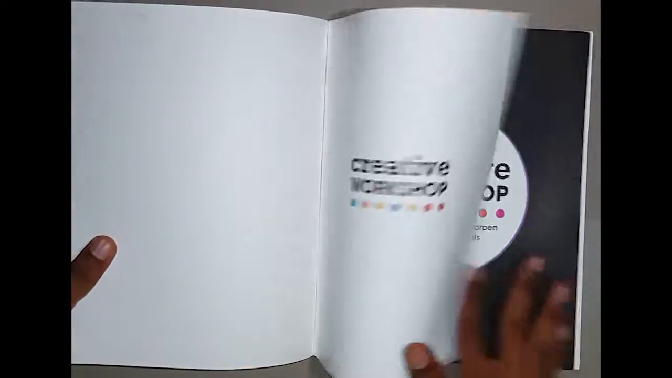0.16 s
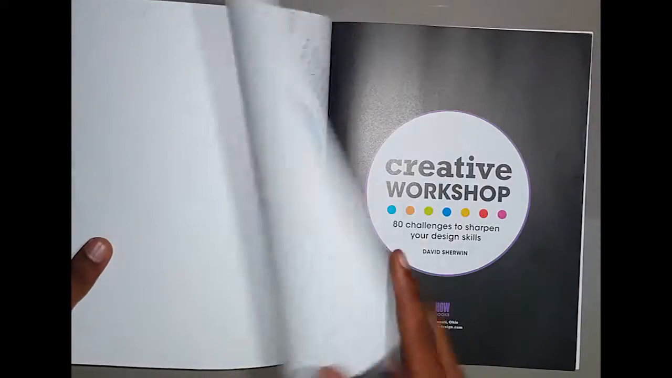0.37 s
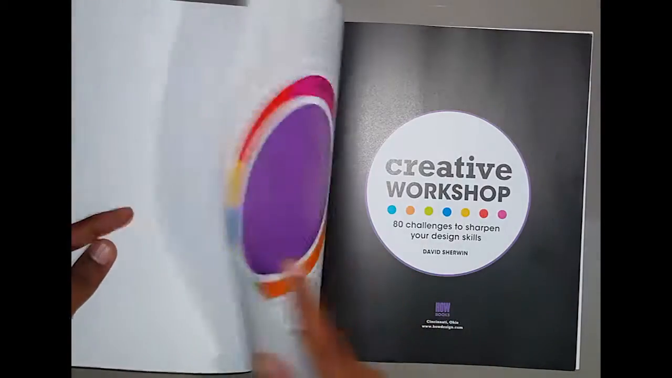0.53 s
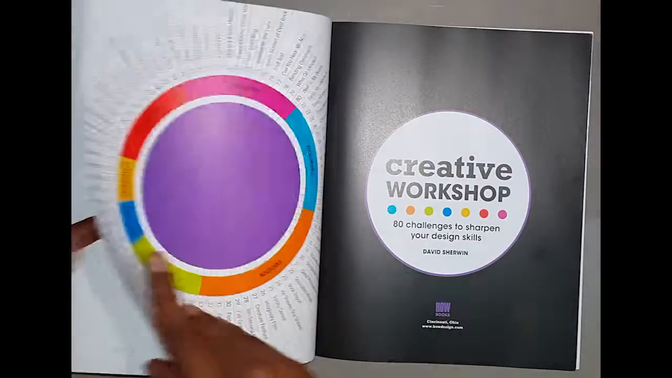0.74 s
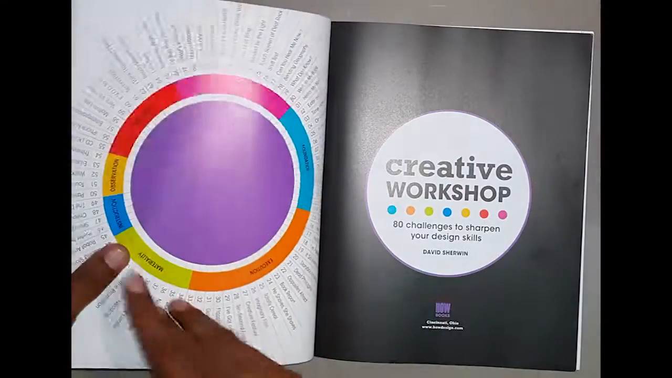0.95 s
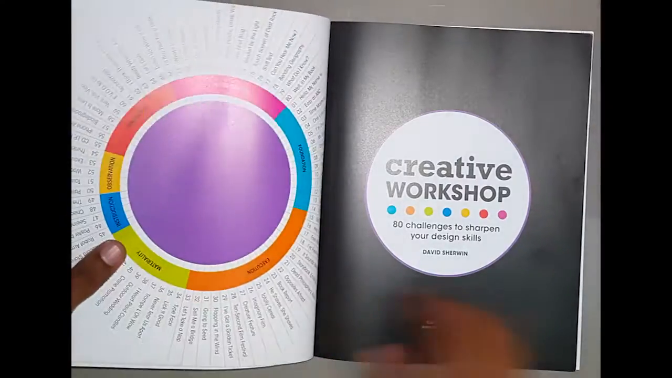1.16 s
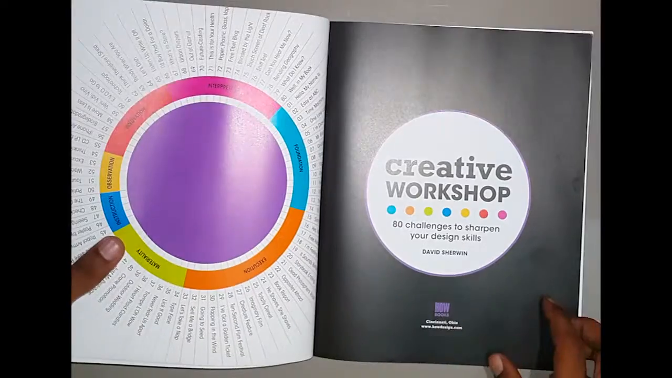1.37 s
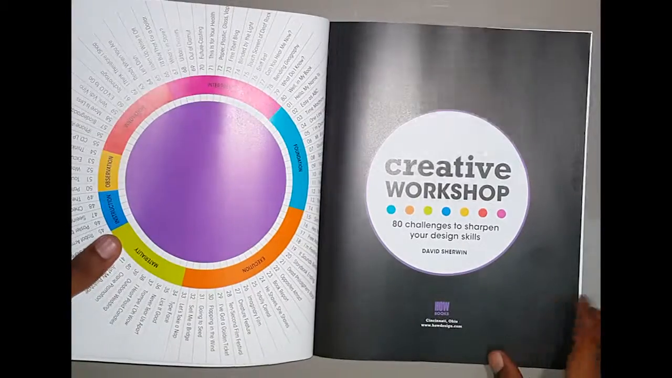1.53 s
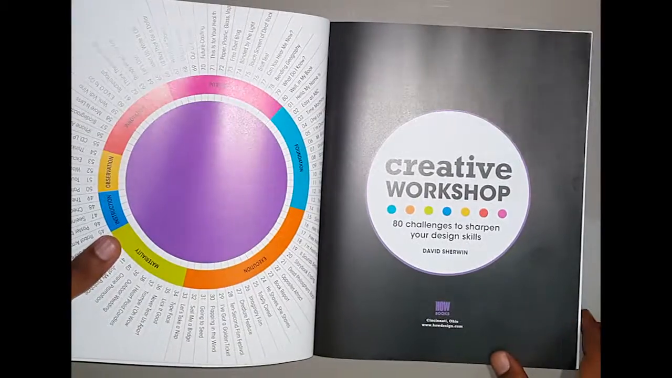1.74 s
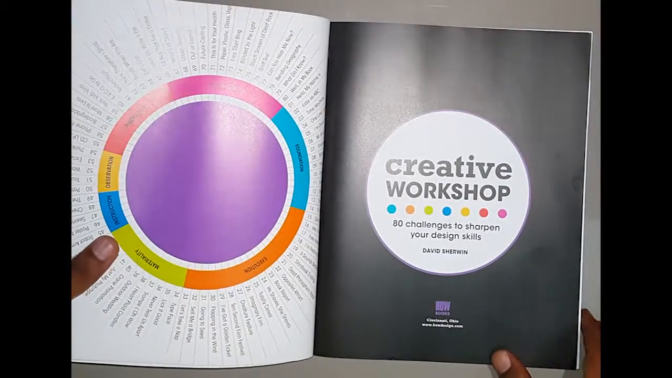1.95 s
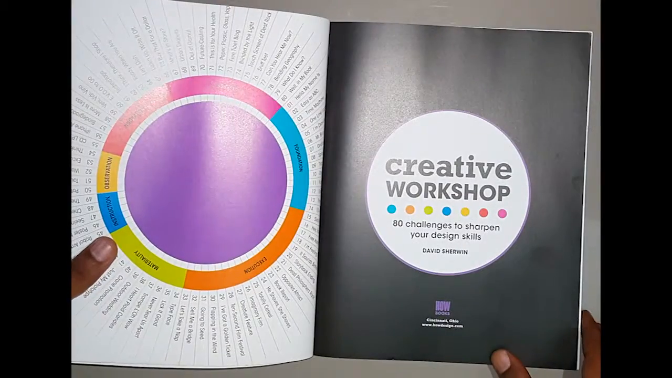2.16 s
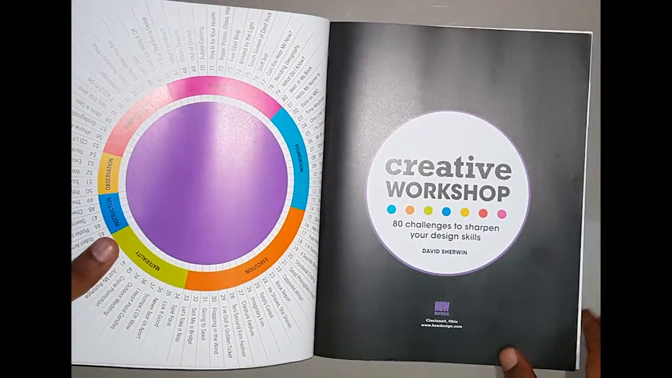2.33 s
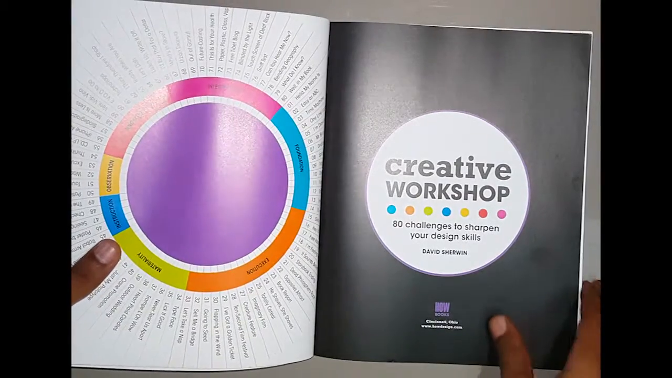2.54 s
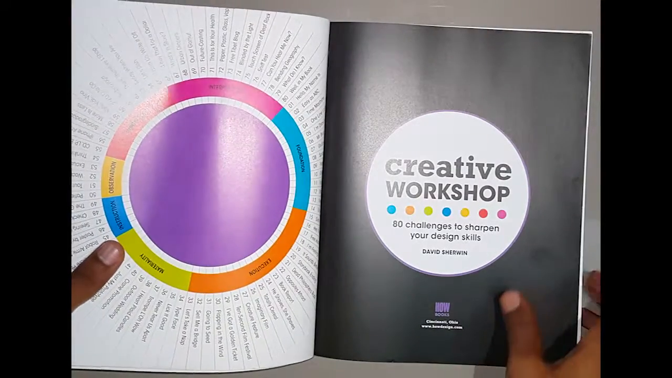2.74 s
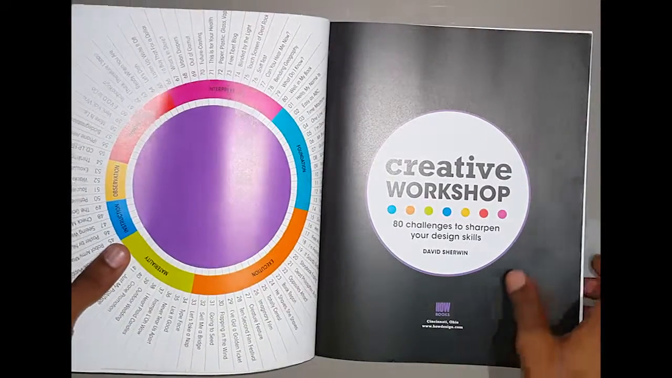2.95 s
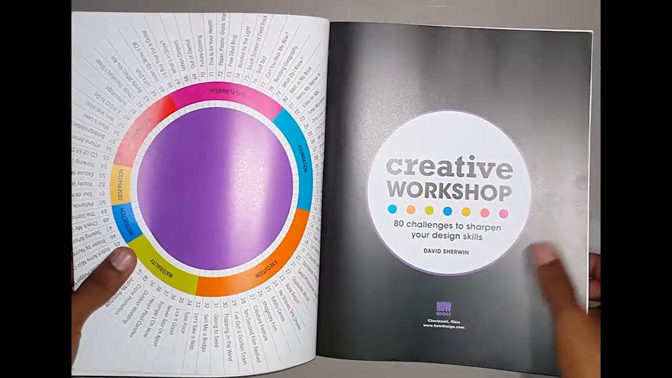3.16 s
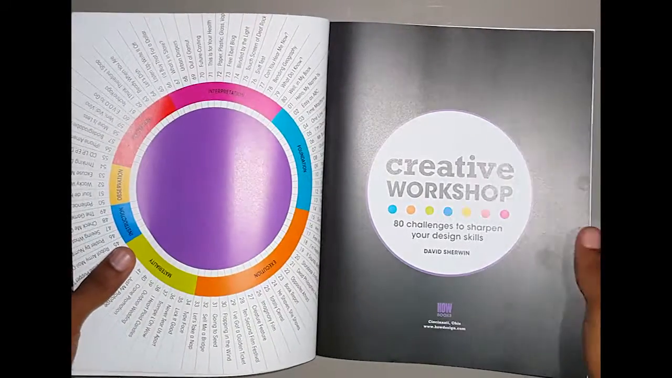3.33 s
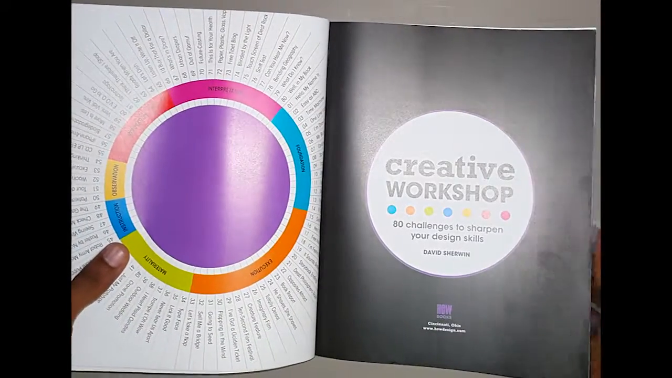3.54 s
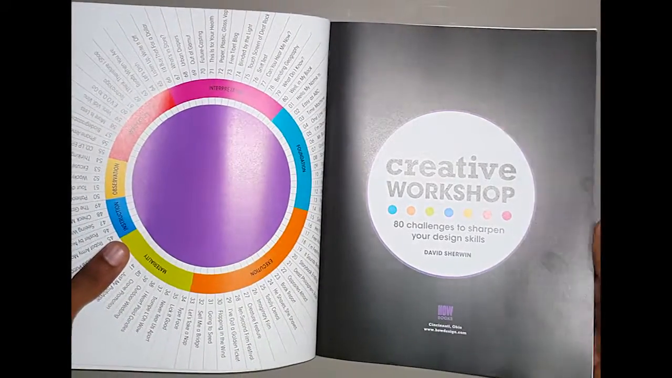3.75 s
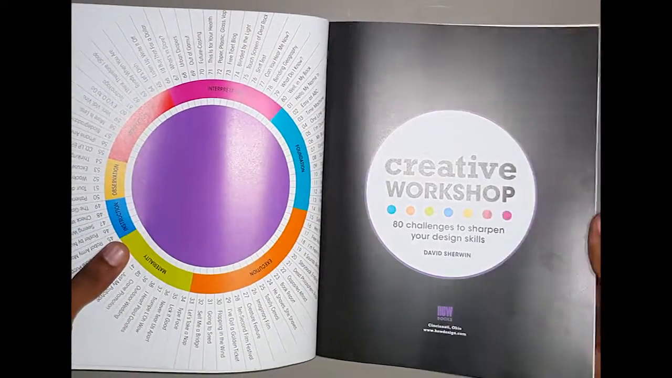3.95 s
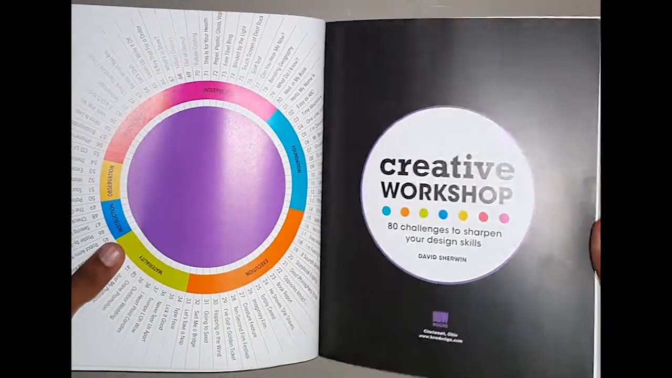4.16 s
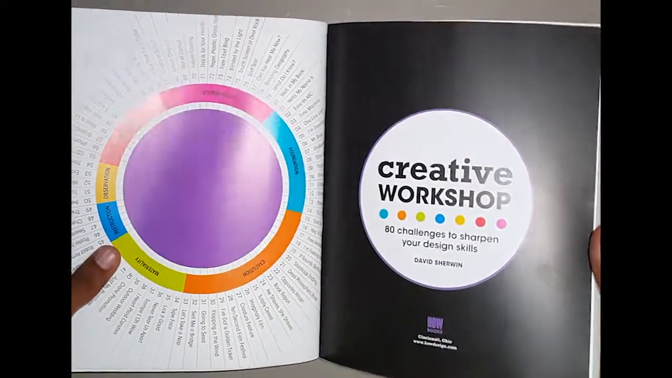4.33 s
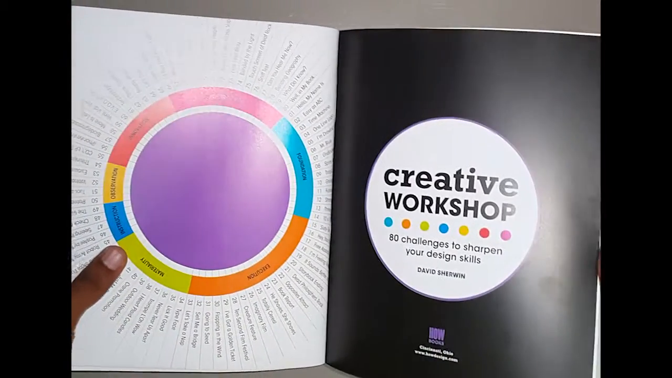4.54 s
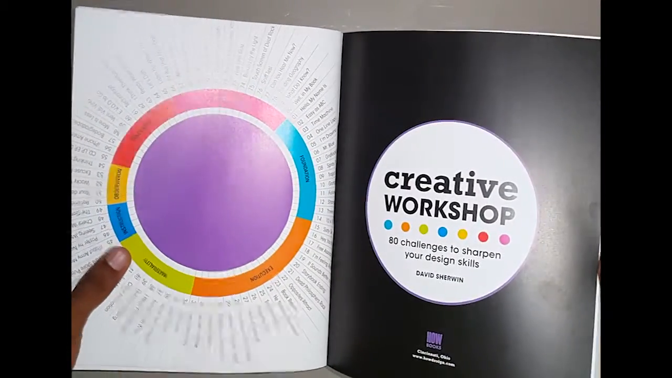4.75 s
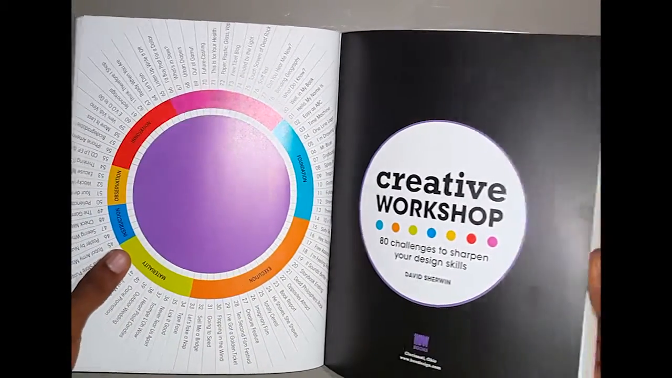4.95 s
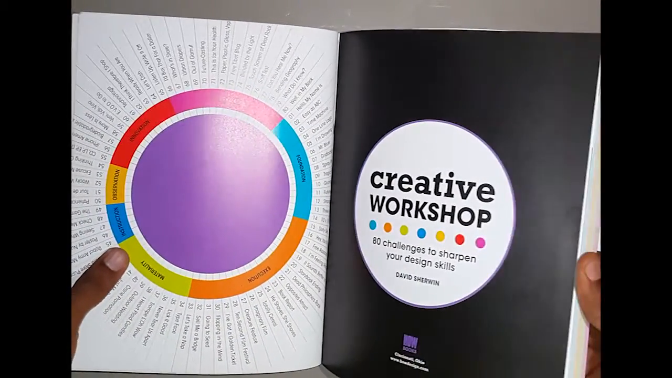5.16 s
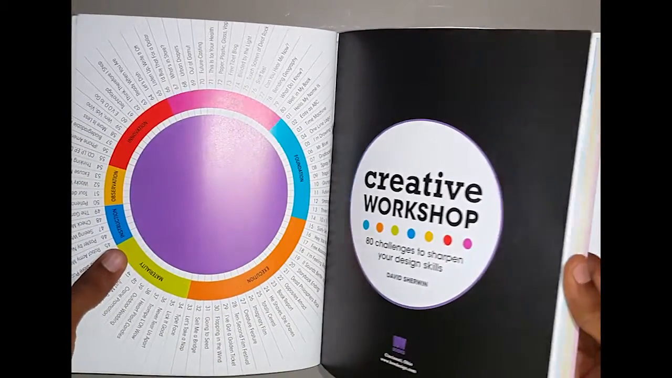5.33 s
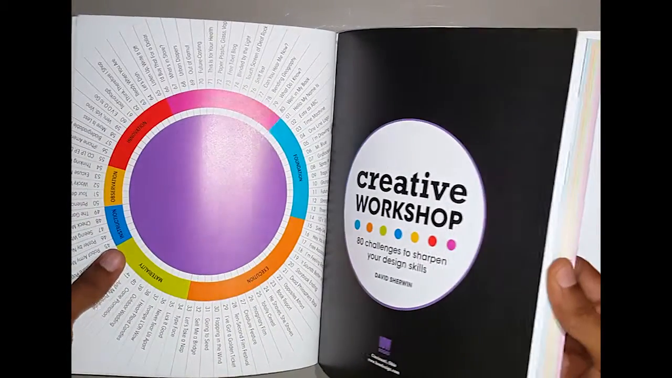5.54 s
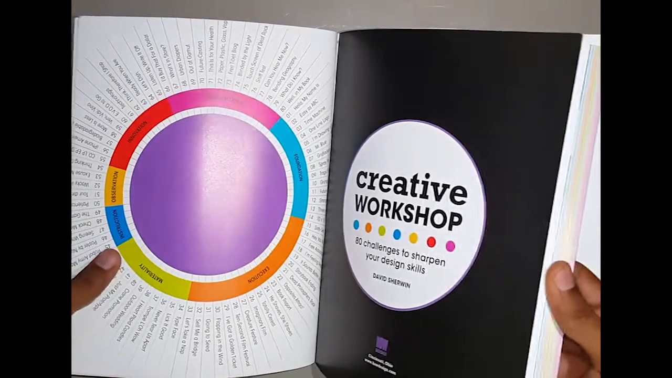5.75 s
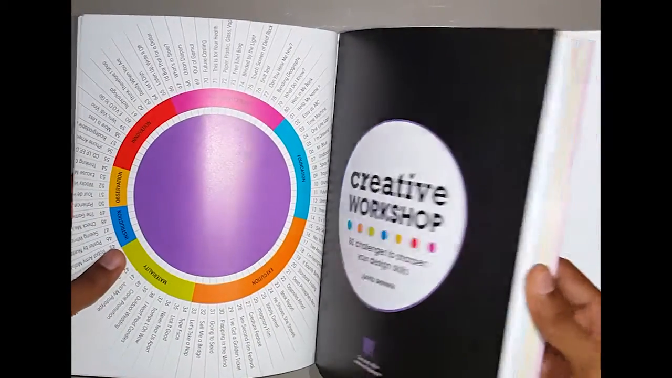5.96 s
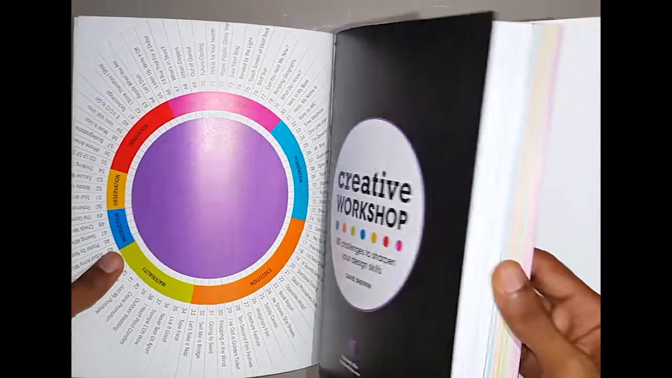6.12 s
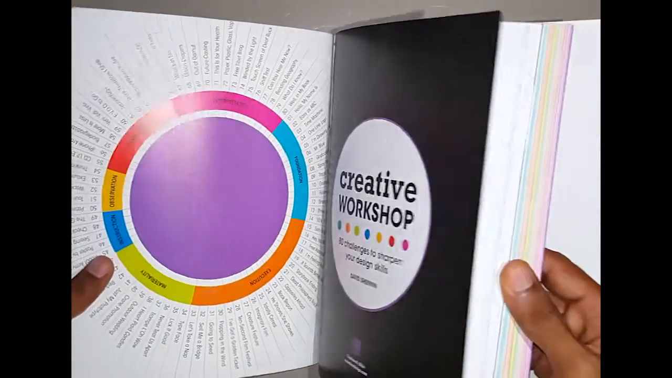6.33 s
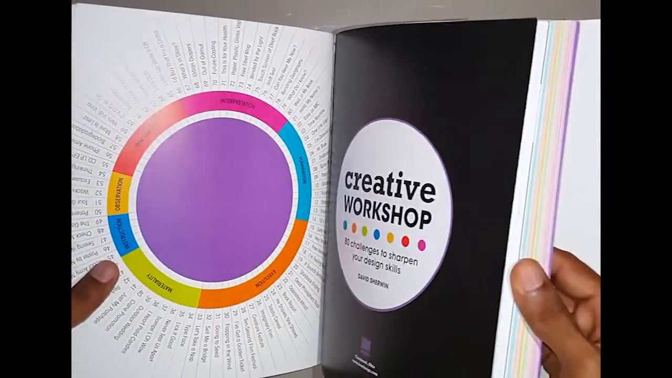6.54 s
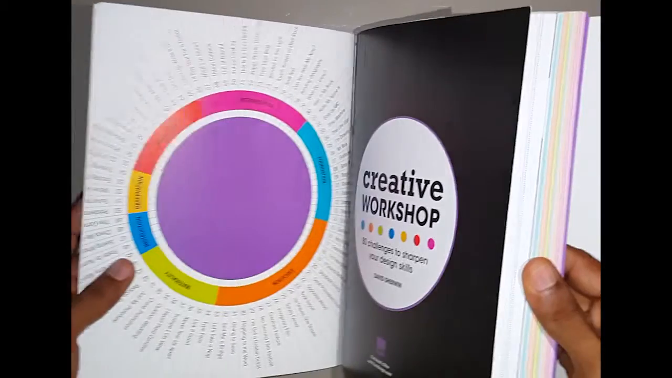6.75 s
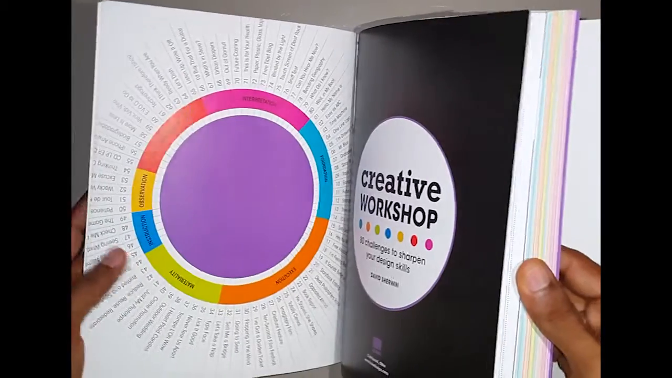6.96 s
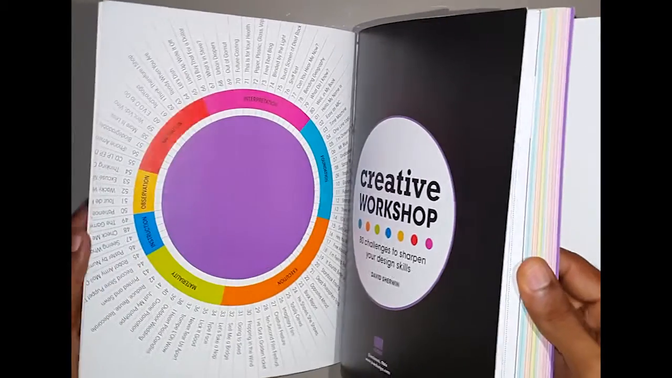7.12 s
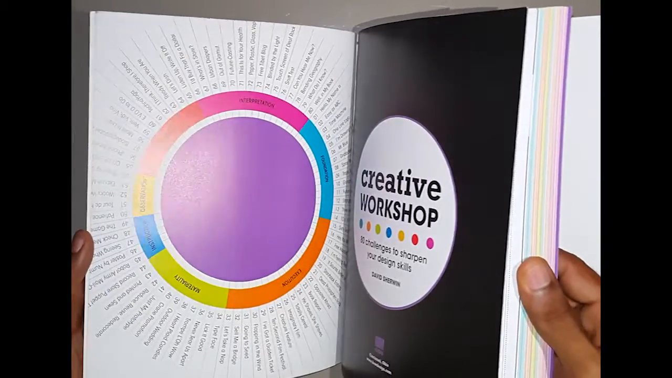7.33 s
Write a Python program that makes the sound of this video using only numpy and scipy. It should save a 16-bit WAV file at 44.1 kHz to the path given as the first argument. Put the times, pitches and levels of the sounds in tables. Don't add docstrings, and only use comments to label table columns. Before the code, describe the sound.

A quiet, small, dry room, heard close in stereo with soft hiss and barely perceptible electronic whine. From 0 to 0.8 seconds a large paper page turns: bright sliding rustle swells around 0.2 and again at 0.6, with whipping edges, dense sharp crease pops, a papery slap and hollow finger knocks on the table. Another crisp snap lands near 1.1, then lighter smoothing strokes and small ticks at about 1.45 and 1.65. It calms until a faint tick at 2.45. Near 2.95 the spine bumps with a low thud; muffled pats and slips follow. Deeper knocks come around 4.05 to 4.35, then page crackle and rubbing near 4.9 to 5.1. Small slaps patter at 5.7 to 5.85 and 6.3 to 6.6, a snap at 6.8, then the heaviest boomy table thud at 7.0 and a last papery tick at 7.13.

```python
import sys
import numpy as np
from scipy import signal
from scipy.fft import rfft, irfft, next_fast_len
from scipy.io import wavfile

SR = 44100
rng = np.random.default_rng(int(sys.argv[2]) if len(sys.argv) > 2 else 0)


def store_pcm(level_fs):
    pcm = np.round(np.clip(level_fs, -1, 1) * 32767).astype(np.int16)
    wavfile.write(sys.argv[1], SR, np.atleast_2d(pcm).T)


def boost_factor(decibels):
    exponent = np.asarray(decibels, float) / 20
    return 10 ** exponent


N = 325899
LIFT_S = 2.9


def seconds():
    return np.arange(N) / SR


def rms_one(x):
    return x / np.sqrt(np.mean(x ** 2) + 1e-20)


def sides(left_db, right_db=0):
    return boost_factor(np.array([[left_db], [right_db]]))


def at_hz(points, hz):
    table_hz, db = np.transpose(points)
    return np.interp(np.log(hz + 1), np.log(table_hz + 1), db)


def coloured(x, gain_db):
    size = next_fast_len(N)
    gain = boost_factor(gain_db(np.fft.rfftfreq(size, 1 / SR)))
    return irfft(rfft(x, size) * gain, size)[..., :N]


def filtered(x, order, hz, kind="low"):
    return signal.sosfilt(signal.butter(order, hz, kind, fs=SR, output="sos"), x)


def drift(rate_hz):
    r = np.exp(-2 * np.pi * rate_hz / SR)
    walk = signal.lfilter([1], [1, -2 * r, r * r], rng.standard_normal(N + SR))
    return rms_one(walk[SR:])


def resonance(x, hz, width):
    r = np.exp(-np.pi * width / SR)
    peak = np.array([1, 0, -1]) * (1 - r * r) / 2
    return signal.lfilter(peak, [1, -2 * r * np.cos(2 * np.pi * hz / SR), r * r], x)


def narrow_tone(x, hz, width):
    return rms_one(resonance(resonance(x, hz, width), hz, width))


def struck_mode(force, hz, t60):
    r, w = boost_factor(-60 / (t60 * SR)), 2 * np.pi * hz / SR
    return signal.lfilter([0, np.sin(w)], [1, -2 * r * np.cos(w), r * r], force + 1e-18)


def blows_at(times, levels_db):
    blows = np.zeros(N)
    blows[np.round(times * SR).astype(int)] = boost_factor(levels_db)
    return blows


def softened(blows, contact_s):
    push = np.hanning(round(contact_s * SR))
    return signal.oaconvolve(blows, push / push.sum())[:N]


def paper_bands(grains_per_s, spread_db):
    # (frequency [Hz], level per Hz [dB])
    spectrum = [(300, -7), (500, -6), (1000, 5.5), (2200, 3.5), (4000, -1), (8000, -12), (11000, -11.5),
                (16000, -16)]
    # (from [Hz], to [Hz])
    bands_hz = [(1500, 4000), (450, 1500), (4000, 8000), (8000, 17000)]
    own_share = [1, 0.95, 0.98, 1]
    far_levels = [-1.56, -3, 2, -5.5]
    lag_s = 0.001217
    born = rng.random((2, N)) < grains_per_s * boost_factor(3 * drift(60)) / SR
    size_db = spread_db * np.minimum(rng.exponential(1, (2, N)), 4)
    grains = born * boost_factor(size_db) * rng.choice([-1, 1], (2, N))
    raw = rms_one(grains) + 0.73 * rng.standard_normal((2, N))
    raw = coloured(raw, lambda hz: at_hz(spectrum, hz))
    out = []
    for band, own, far_db, sign in zip(bands_hz, own_share, far_levels, (1, -1, -1, 1)):
        near, other = rms_one(filtered(raw, 2, band, "band"))
        late = np.roll(near, round(lag_s * SR))
        far = np.sqrt(own) * other - np.sqrt(1 - own) * late
        out.append(sign * np.array([near, boost_factor(far_db) * far]))
    return out


def sliding(drag_db):
    # (loudest at [s], level [dB], length [s], body rel. [dB], sheen rel. [dB])
    strokes = [(0.005, -67.5, 0.093, 4.5, -5), (0.121, -46.5, 0.091, -16, 1.5),
               (0.084, -62, 0.057, -13, -7), (0.227, -43.5, 0.37, -24, 2.1), (0.603, -40.5, 0.23, 1, -49),
               (0.684, -54, 0.25, 1.5, -12), (0.904, -60.5, 0.6, -7, -4), (0.982, -53, 0.16, -1.5, 0),
               (1.118, -50.5, 0.25, -3.5, -16), (1.457, -54, 0.097, -25, 2.5),
               (1.646, -54.5, 0.2, -18, -3.5), (1.697, -62, 0.059, -6, 1), (1.895, -59.5, 0.26, -38, -11),
               (1.816, -63.5, 0.029, -12, -7), (2.101, -63.5, 0.095, -18, 0.5), (2.483, -62, 0.16, -20, -5),
               (2.898, -57.5, 0.1, -8, -7), (0.169, -50.5, 0.3, -0.5, -2), (0.545, -54, 0.085, 0, -3),
               (0.774, -59.5, 0.048, -11, -13)]
    # (loudest at [s], level [dB], length [s], body [dB], sheen [dB])
    rubs = [(4.084, -70, 0.89, -20, -11), (4.315, -56.5, 0.25, -13, -10), (4.564, -66.5, 0.7, -1.5, -5.5),
            (4.683, -69, 0.35, 1.5, -8), (4.931, -51.5, 0.13, -2, -1.5), (5.04, -53.5, 0.1, -5.5, -3),
            (5.007, -61.5, 0.27, -1.5, -2), (5.099, -56, 0.075, 1.5, -9), (5.37, -65.5, 0.21, -8, -4),
            (5.499, -67, 0.16, -12, -8), (6.118, -73.5, 0.38, 3.5, -9), (6.258, -83, 0.13, -2, 9),
            (6.54, -61, 0.25, -6, -11), (6.705, -58.5, 0.23, -13, -6), (6.808, -65.5, 0.37, 7, -8),
            (7.061, -66.5, 0.11, 0.5, 3)]
    # (loudest at [s], level [dB], length [s])
    whips = [
        (0.292, -47, 0.21),
        (0.341, -47.5, 0.13),
        (0.568, -52.5, 0.03),
        (0.591, -57, .025),
        (0.692, -61, 0.067),
        (1.0, -60, 0.032),
        (1.089, -52.5, 0.039),
        (4.915, -60, 0.067),
        (6.85, -68.5, 0.16),
        (6.53, -70, 0.054),
    ]
    rise_share, range_db = 0.37, 31.5
    roundness = 1.476
    t = seconds()
    creep_db = -73.5 + 0.78 * (drag_db - drag_db.mean()) - 3 * (t < LIFT_S)
    power = boost_factor(2 * np.add.outer([0, -3.5, -5.5, -3], creep_db))
    moves = [(*row, -10.5 + 0.45 * row[-1]) for row in strokes + rubs]
    moves += [(*row, -3.5, -2, 4) for row in whips]
    for s, db, length, *colour_db in moves:
        away = np.maximum((s - t) / rise_share, (t - s) / (1 - rise_share)) / length
        near = away < 2
        swell_db = db - range_db * away[near] ** roundness
        power[:, near] += boost_factor(2 * np.add.outer([0, *colour_db], swell_db))
    crisp_db, *others = 10 * np.log10(power)
    return crisp_db, *(db - crisp_db for db in others)


def rustle(crisp_db, *rel_db):
    crisp, *others = paper_bands(grains_per_s=2500, spread_db=1)
    flutter = boost_factor(crisp_db - 3.5 + 1.6 * drift(70))
    return flutter * (crisp + sum(boost_factor(db) * band for db, band in zip(rel_db, others)))


def snaps():
    # (time [s], peak [dB], body rel. [dB], sheen rel. [dB], t60 [s])
    creases = [(0.107, -35, -3.5, -12, 0.044), (0.2737, -37.5, 8, -19, 0.047),
               (0.529, -39.5, -28, -25, 0.06), (0.557, -31.5, -17, -11, 0.087), (0.567, -36, -10, 0, 0.066),
               (0.591, -20.5, -17, -13, 0.045), (0.603, -29, -8, -27, 0.05), (0.627, -20.5, -5, -32, 0.049),
               (0.634, -40, -8, -27, 0.051), (0.699, -33.5, -1, -5.5, 0.033), (0.966, -48, -32, -29, 0.2),
               (1.0852, -25, -15, -15, 0.06), (1.104, -46.5, 12, -27, 0.058), (1.131, -42, -3, -25, 0.056),
               (1.0889, -18, -5, -35.5, 0.052), (1.4401, -35, -22, -18, 0.043),
               (1.4643, -38.5, -32, -22, 0.12), (1.538, -51.5, -8, -8, 0.089),
               (1.643, -24.5, -23, -6.5, 0.023), (1.695, -53, -22, 4, 0.051),
               (2.443, -37.5, -15, -10, 0.083), (4.111, -49, -2, -5, 0.05), (4.4942, -55, 5, 4, 0.41),
               (4.8628, -49, -10, -4, 0.065), (4.9043, -29, -14, -4, 0.11), (4.943, -38.5, -15, -12, 0.06),
               (5.2545, -48.5, -0.5, -10, 0.038), (6.476, -52.5, 1, -4, 0.048),
               (6.516, -49, -11, -3, 0.071), (6.521, -42, -3, -7, 0.18), (7.1063, -43, -12, -22, 0.043)]
    # (time [s], peak [dB], body rel. [dB], sheen rel. [dB])
    pats = [(0.277, -31.5, 13.5, -2), (0.4, -52.5, 21.5, -17), (0.776, -39.5, 4, -2), (0.832, -45, 5, -5),
            (1.0346, -54, 17.5, -12), (1.294, -51.5, 2, 3), (1.3452, -51.5, 2, 4.5), (2.1, -66, 8.5, 4),
            (2.88, -39.5, -12, -6), (2.96, -53.5, 11, 3), (3.142, -53.5, 2.5, -18), (3.307, -53.5, 5.5, 9),
            (3.463, -53.5, 3, -17), (3.81, -68.5, 19.5, -17), (4.044, -57.5, 10.5, -17),
            (4.143, -46.5, 7.5, -15), (4.3173, -44.5, 7.5, -24), (5.102, -40, -6, -15),
            (5.733, -59.5, 14, 8), (5.786, -58, 9, 10), (5.838, -62, 15, 12.5), (6.327, -59, 10, 11),
            (6.377, -49, 8.5, 5.5), (6.42, -49.5, 7, 3), (6.566, -54, 4, -9), (6.82, -34, -6, -11.5),
            (6.991, -54, 13, 3), (7.129, -39, -5, -2), (7.258, -42, -2.5, -32)]
    pat_t60_s, pat_rise_s, crease_rise_s = 0.051, 0.0037, 0.0016
    bands = paper_bands(grains_per_s=2900, spread_db=0)
    out = np.zeros((2, N))
    events = [(*row, crease_rise_s) for row in creases]
    events += [(*row, pat_t60_s, pat_rise_s) for row in pats]
    for s, peak_db, body_db, sheen_db, t60, rise in events:
        i = round(s * SR)
        t = np.arange(min(SR // 4, N - i)) / SR
        t60 = min(t60, 0.3)
        # relative level [dB], part of the decay time
        shares = [(0, 0.8), (body_db, 1.1), (sheen_db, 0.6), (sheen_db - 34, 0.45)]
        burst = sum(band[:, i:i + len(t)] * boost_factor(db - 60 * t / (t60 * part))
                    for band, (db, part) in zip(bands, shares))
        out[:, i:i + len(t)] += boost_factor(peak_db - 9) * burst * np.minimum(t / rise, 1)
    return out


def room(x):
    t60_s, level_db, wall_cut_hz = 0.074, -7, 2370
    t = np.arange(SR // 3) / SR
    tail = rng.standard_normal((2, len(t))) * boost_factor(-60 * t / t60_s) * (t > 0.002)
    tail = filtered(tail, 1, wall_cut_hz)
    tail = tail / np.sqrt(np.sum(tail ** 2, axis=1, keepdims=True))
    return boost_factor(level_db) * signal.fftconvolve(x.mean(axis=0, keepdims=True), tail, axes=1)[:, :N]


def hollow(x):
    # (frequency [Hz], width [Hz], left [dB], right [dB], left sign [+-1])
    cavities = [(602, 140, 22.5, 1.5, -1), (604, 87, 19.5, 22, -1), (900, 41, 7.5, 16.5, 1),
                (1023, 65, 9.5, 15.5, 1), (1196, 21, 9, -28, -1), (1843, 30, 17.5, 14, -1),
                (2183, 234, 3.5, 5.5, 1), (2560, 8.3, 17, 14, -1), (2997, 29, -9, 16.5, 1),
                (3590, 240, 16, 6, -1), (5100, 170, -14.5, -11, 1), (5670, 92, 22.5, 16, -1),
                (7140, 380, -29, 7.5, 1)]
    out = 0.86 * x
    drive = x[0] * boost_factor(1.5 * (seconds() > LIFT_S))
    for hz, width, left_db, right_db, sign in cavities:
        gains = sides(left_db, right_db) * [[sign], [1]]
        flicker = boost_factor(-13.5 + 3.5 * drift(7.7))
        out = out + flicker * gains * resonance(drive, hz, width)
    return out


def slaps():
    # (time [s], peak [dB], bright modes rel. [dB])
    hits = [(0.1103, -46, 0), (0.2773, -32, -16), (0.559, -55, -2), (0.604, -33, -8), (0.702, -40.5, -1),
            (2.4432, -66, 14), (4.111, -62, -0.5), (4.142, -44, -5), (5.105, -47.5, -7), (5.698, -56, -11),
            (5.706, -55, -11), (5.737, -54.5, -6), (5.785, -53, -3), (5.8, -56, 0), (5.807, -52, -17),
            (5.8389, -48.5, -13), (6.329, -48, -13), (6.3763, -41.5, -7), (6.421, -48, -7),
            (6.478, -52.5, -6), (6.568, -50, -10), (1.092, -48, 0), (1.034, -41.5, -20), (3.31, -65, -8),
            (0.573, -40, -15)]
    # (frequency [Hz], level [dB], t60 [s], left [dB])
    stack = [(700, -15, 0.022, -15), (900, -9, 0.079, -6), (1040, -8.5, 0.082, -5.5),
             (1460, -15.5, 0.012, 5), (2180, -7.5, 0.034, -2.5), (3007, -11.5, 0.038, -1),
             (5400, -15, 0.052, -0.5)]
    out = np.zeros((2, N))
    at, peak_db, bright_db = np.transpose(hits)
    for k, (hz, db, t60, left_db) in enumerate(stack):
        luck_db = rng.normal(0, 2.5, len(at))
        clicks = blows_at(at, peak_db + db + (k > 3) * bright_db + luck_db)
        out += struck_mode(clicks, hz, t60) * sides(left_db)
    return out


def ticks():
    # (time [s], peak [dB])
    edges = [(0.1093, -35), (0.56, -49), (1.0849, -42), (1.091, -36), (1.642, -42), (2.4429, -44),
             (4.144, -57), (4.907, -45), (5.108, -49), (5.735, -58), (6.329, -64), (6.377, -52),
             (6.421, -58), (6.477, -59), (6.523, -48), (6.569, -58), (7.132, -45)]
    t60_s, low_hz, high_hz = 0.0042, 700, 6850
    out, t = np.zeros((2, N)), np.arange(SR // 40) / SR
    for s, peak_db in edges:
        i = round(s * SR)
        out[:, i:i + len(t)] += rng.standard_normal((2, len(t))) * boost_factor(peak_db - 60 * t / t60_s)
    return filtered(out + 1e-18, 1, [low_hz, high_hz], "band")


def rings():
    # (time [s], peak [dB], frequency [Hz], t60 [s])
    pitches = [(0.11, -38, 5460, 0.046), (0.11, -35.5, 1210, 0.091), (0.21, -39, 2240, 0.11),
               (0.56, -25.5, 2130, 0.07), (0.277, -34, 1015, 0.14), (0.595, -36, 920, 0.13),
               (0.6, -34.5, 2180, 0.12), (0.627, -44, 945, 0.068), (0.832, -49, 287, 0.11),
               (0.964, -43.5, 1740, 0.14), (1.033, -40, 910, 0.07), (1.088, -37.5, 556, 0.16),
               (1.295, -46, 353, .08), (1.347, -43, 352, 0.073), (3.812, -49, 700, 0.048),
               (4.045, -66, 1010, 0.069), (4.142, -46.5, 998, 0.11), (4.318, -46, 1255, 0.063),
               (4.49, -64, 865, 0.059), (4.93, -49, 4870, 0.18), (4.985, -57, 4760, 0.17),
               (5.035, -46.5, 2130, .08), (5.04, -46, 990, 0.088), (5.07, -54, 4900, 0.15),
               (5.075, -57, 900, 0.077), (5.106, -37.5, 880, 0.059), (5.108, -41, 2200, 0.085),
               (5.256, -58, 5100, 0.051), (6.329, -43.5, 815, 0.066), (6.376, -49, 870, .05),
               (6.521, -40.5, 2000, 0.056), (2.103, -58, 5700, 0.07), (6.567, -48, 780, .05),
               (6.7, -56, 940, 0.14), (6.822, -33, 1040, 0.071), (7.131, -41, 1054, 0.079)]
    q, rise_s, right_db = 12, 0.003, -3
    out, t = np.zeros((2, N)), np.arange(SR // 5) / SR
    for s, peak_db, hz, t60 in pitches:
        i = round(s * SR)
        noise, other = rng.standard_normal((2, len(t)))
        pair = np.array([noise, boost_factor(right_db) * (1.4 * other - 0.5 * noise)])
        fade = boost_factor(peak_db - 60 * t / t60) * np.minimum(t / rise_s, 1)
        out[:, i:i + len(t)] += narrow_tone(pair, hz, hz / q) * fade
    return out


def drag_level():
    # (time [s], level [dB])
    weight = [(0.0, -64.5), (0.41, -45), (0.51, -60.5), (0.59, -43), (0.72, -55), (1.12, -50),
              (1.21, -59.5), (2.5, -74), (3.4, -68), (3.55, -64.5), (4.49, -61), (5.11, -61.5), (5.55, -69),
              (5.86, -61.5), (6.05, -73.5), (6.45, -54), (6.79, -71), (6.95, -61.5)]
    return np.interp(seconds(), *np.transpose(weight))


def deep_drag(drag_db):
    # (time [s], level [dB])
    settles = [
        (2.959, -36.5),
        (4.282, -29.5),
        (7.018, -25),
    ]
    t = seconds()
    lifted_db = np.interp(t, [LIFT_S, LIFT_S + 0.5], [-2.5, 8.5])
    power = boost_factor(2 * (drag_db + lifted_db))
    for s, db in settles:
        power = power + (t > s) * boost_factor(2 * (db - 161 * np.abs(t - s)))
    return 10 * np.log10(power) - drag_db


def table(drag_db, drag_deep_db):
    # (frequency [Hz], left [dB], right [dB], t60 [s], left sign [+-1])
    modes = [(43.3, 1.5, -2, 0.66, 1), (70, -48, -57, 0.17, 1), (101.8, 0.5, -1.5, 0.2, 1),
             (133.2, -6.5, -4.5, 0.28, 1), (161.4, -4, -8.5, 0.18, 1), (241, -1.5, -6, 0.075, 1),
             (257.5, -2.5, 3.5, 0.21, 1), (317, -15, -1.5, 0.16, 1), (364, -63, 5.5, 0.1, 1),
             (416.2, -4.5, 1.5, 0.17, -1), (554.5, -0.5, 3.5, 0.099, -1), (677, -67, 2, 0.036, -1)]
    # (time [s], peak [dB], deep modes rel. [dB], upper modes rel. [dB])
    fingers = [(0.103, -42.5, -3.5, -15.5), (0.276, -29, -43, -11.5), (0.398, -46, -44, 7),
               (0.531, -38.5, -16, -18), (0.548, -51, 2, -6), (0.582, -29.5, -13, -8.5),
               (0.617, -27.5, -38, -10), (0.695, -28.5, -10, -21), (0.777, -38, -5, -9.5),
               (0.832, -34, -42, -11), (1.002, -54.5, 16, -24), (1.087, -31, -2.5, -9),
               (1.295, -57, -37, 3.5), (1.339, -66, -30, 12.5), (1.436, -51, 6, -13),
               (1.639, -44.5, -5, -13.5), (1.858, -59.5, 13, -2.5), (2.091, -52, -32, -8),
               (2.444, -49, 2, -11), (2.505, -50, 6, -13.5), (2.772, -51, 2, -19), (2.879, -46.5, 5, -11)]
    # (time [s], peak [dB], deep modes rel. [dB], upper modes rel. [dB])
    spine = [(2.939, -52.5, -7, -3), (2.959, -39.5, -16, 1), (3.467, -45, -1, -19),
             (3.577, -53.5, 7.5, -24), (3.645, -47, 5.5, -19), (3.721, -54.5, 8, -16),
             (3.798, -57.5, 9, -14), (3.874, -52, 12, -15), (3.951, -57.5, 11, -22), (4.201, -51, 5, -24),
             (5.371, -53.5, 10, -18), (5.539, -58, 6.5, -28), (4.138, -47, 5.5, -13.5),
             (4.274, -42, -1, -6), (4.488, -39.5, -30, -16.5), (4.559, -39, -15, -19), (4.6, -54, -1, -16),
             (4.869, -50, 9, -19), (4.919, -39.5, -1, -10), (5.109, -44, 4.5, -38), (5.247, -49, 5.5, -8.5),
             (5.72, -42.5, -5, -21), (5.796, -36.5, -2.5, -16.5), (6.072, -44.5, 4, -24),
             (6.329, -45, 5.5, -8), (6.347, -38, -2, -21), (6.374, -43.5, -3, -10),
             (6.529, -39.5, -38, -12.5), (6.565, -46.5, -28, -4), (6.815, -39.5, -22, -11),
             (6.791, -42.5, 4, -13.5), (6.861, -44.5, -17, -18), (6.988, -34.5, 11, -18),
             (7.018, -45, 1, -5)]
    lead_s, spread_s, contact_s = 0.00315, 0.00803, 0.0027
    out = np.zeros((2, N))
    drag = rng.standard_normal(N) * boost_factor(drag_db - 39 + 4.87 * drift(31))
    at, peak_db, deep_db, upper_db = np.transpose(fingers + spine)
    for hz, left_db, right_db, t60, sign in modes:
        deep, upper = hz < 190, hz > 280
        late = -lead_s + spread_s * rng.random(len(at))
        luck_db = rng.normal(0, 1.5, len(at))
        level_db = peak_db - 7.5 + deep * (deep_db + 1) + upper * (upper_db + 14) + luck_db
        force = drag * boost_factor(deep * drag_deep_db) + softened(blows_at(at + late, level_db), contact_s)
        out += struck_mode(force, hz, t60) * sides(left_db, right_db) * [[sign], [1]]
    return filtered(out, 4, 93.7, "high")


def bumps():
    # (time [s], boom [dB], thud [dB], knock [dB], rim [dB])
    heavy = [(0.59, -38, -52, -28.5, -42), (0.631, -50, -46, -34, -45), (0.692, -57, -55, -37, -38),
             (3.562, -45, -59, -67, -64), (2.957, -31, -25, -19, -27), (3.001, -35.5, -50, -55, -47),
             (4.047, -39, -38, -30, -50), (4.2742, -29, -42, -23, -36), (4.2809, -35, -52, -37, -55),
             (4.332, -34.5, -46, -32.5, -33), (4.371, -57, -37.5, -37, -43), (6.999, -21, -14, -21.5, -44),
             (7.01, -43, -54, -16, -34), (7.028, -19.5, -46, -30.5, -49)]
    # (frequency [Hz], t60 [s], left [dB])
    modes = [(103, 0.12, 1.5), (165, 0.058, 1.5), (253.6, 0.17, -6.5), (292.6, 0.13, -27)]
    out = np.zeros((2, N))
    at, *levels_db = np.transpose(heavy)
    for (hz, t60, left_db), level_db in zip(modes, levels_db):
        force = softened(blows_at(at, level_db), contact_s=0.0031)
        out += struck_mode(force, hz, t60) * sides(left_db)
    return filtered(out, 4, 94, "high")


def hum():
    # (time [s], level [dB])
    slips = [
        (3.93, -57),
        (3.5, -52.5),
        (4.71, -47.5),
        (6.83, -47),
        (6.775, -62),
    ]
    slip_s = 0.057
    t = seconds()
    swell = sum(boost_factor(db) * np.exp(-((t - s) / slip_s) ** 2) for s, db in slips)
    return sides(-7) * swell * narrow_tone(rng.standard_normal(N), hz=259.4, width=23)


def swish():
    # (from [s], to [s], level [dB], from [Hz], to [Hz], width [Hz])
    whistle = (3.86, 4.12, -70, 3000, 2852, 260)
    start, end, db, from_hz, to_hz, width = whistle
    noise = rng.standard_normal((2, N))
    done = np.clip((seconds() - start) / (end - start), 0, 1)
    high, low = (narrow_tone(noise, hz, width) for hz in (from_hz, to_hz))
    level = boost_factor(db + 2.3 * drift(11)) * np.sin(np.pi * done) ** 0.3
    return level * ((1 - done) * high + done * low)


def sway():
    tone = narrow_tone(rng.standard_normal(N), hz=41.5, width=20)
    held_db = np.interp(seconds(), [3.4, 3.7, 4.2, 6.0, 6.6], [-36, 6, 0, -6, -17])
    return tone * boost_factor(-75 + held_db + 7.5 * drift(5))


def whines():
    # (frequency [Hz], width [Hz], level [dB], start [s])
    electronics = [
        (7300, 110, -92, -2),
        (9170, 70, -85, 5.85),
        (12180, 120, -89, -4),
    ]
    out, t = np.zeros((2, N)), seconds()
    for hz, width, db, s in electronics:
        band = rms_one(resonance(rng.standard_normal((2, N)), hz, width))
        out += boost_factor(db) * band * np.clip((t - s + 0.1) / 0.1, 0, 1)
    return out


def hiss():
    # (frequency [Hz], level per Hz [dB])
    spectrum = [(18, -64), (30, -25), (48, -13.5), (103, -1), (193, -19.5), (251, -0.5), (301, -22),
                (509, -19), (1030, -21.5), (1150, -22), (2150, -22), (4610, -30.5), (15800, -25.5)]
    # (frequency [Hz], left minus right [dB])
    balance = [(60, 14), (200, -14), (380, 14), (700, 3.5), (1290, 4), (2380, -1.5), (4400, -6), (7000, 6),
               (8120, 9.5), (15000, 5)]
    mid, left, right = rng.standard_normal((3, N))
    bass = filtered(mid, 2, 320)
    own = filtered([left, right], 4, 320, "high")
    both = coloured(bass + 0.65 * own,
                    lambda hz: at_hz(spectrum, hz) + np.outer([0.5, -0.5], at_hz(balance, hz)))
    return boost_factor(-65) * rms_one(both)


def scene():
    drag_db = drag_level()
    paper = rustle(*sliding(drag_db)) + snaps()
    book = hollow(paper + room(paper)) + slaps() + ticks() + rings()
    top = table(drag_db, deep_drag(drag_db)) + bumps() + hum() + swish()
    return book + top + sway() + whines() + hiss()


def roll_off(x):
    return signal.sosfilt(signal.butter(12, 15810, fs=SR, output="sos"), x)


def record(dry):
    mix = dry - 0.0005
    return roll_off(mix)


dry = scene()
out = record(dry)
store_pcm(out)
```